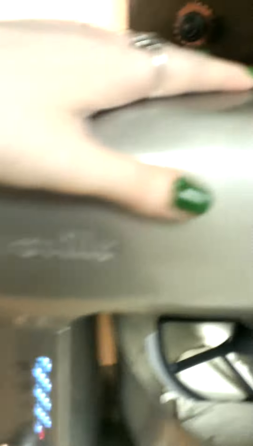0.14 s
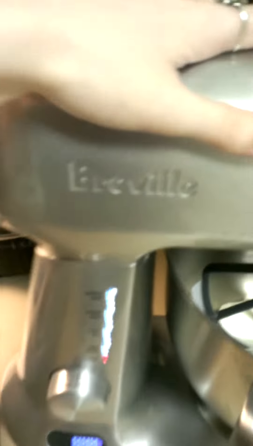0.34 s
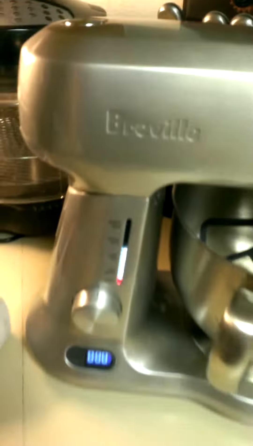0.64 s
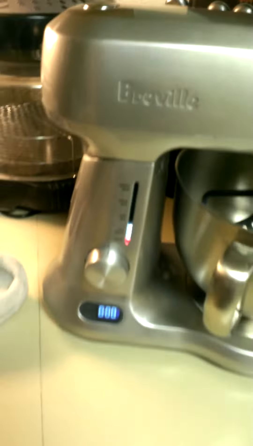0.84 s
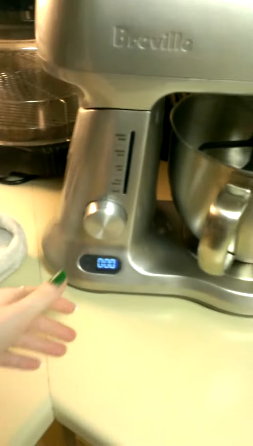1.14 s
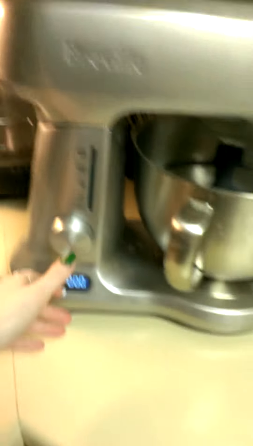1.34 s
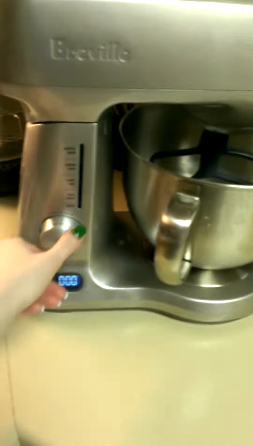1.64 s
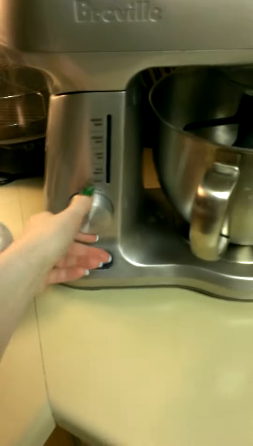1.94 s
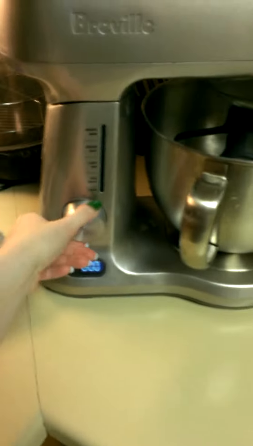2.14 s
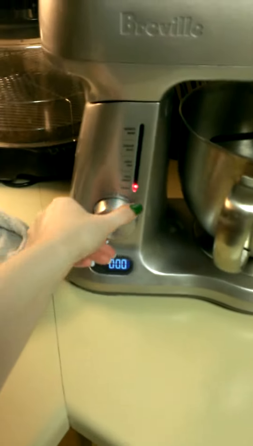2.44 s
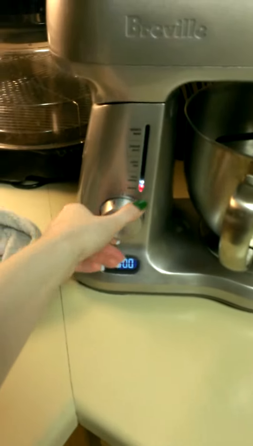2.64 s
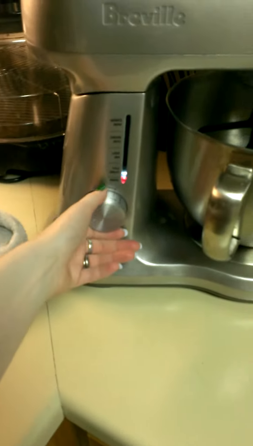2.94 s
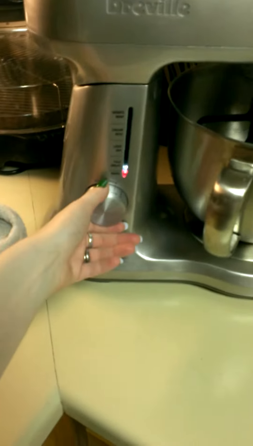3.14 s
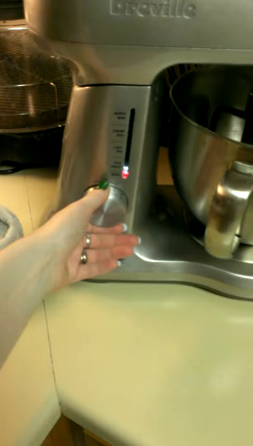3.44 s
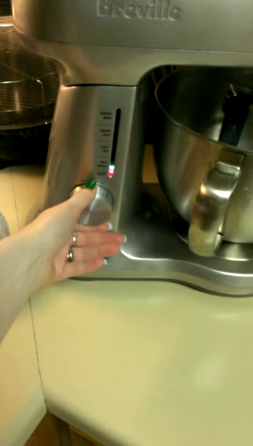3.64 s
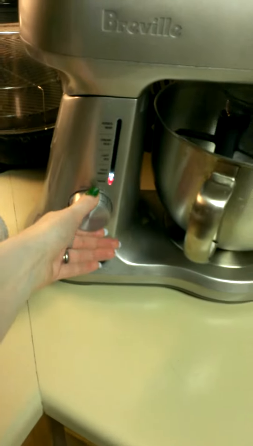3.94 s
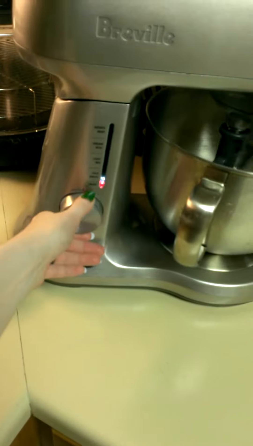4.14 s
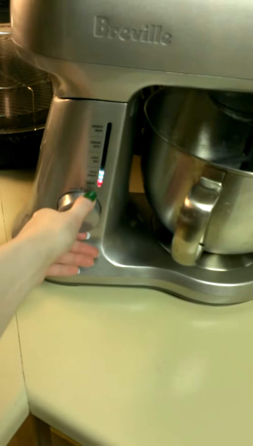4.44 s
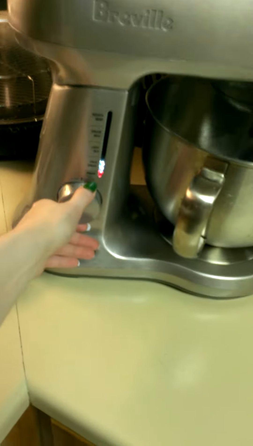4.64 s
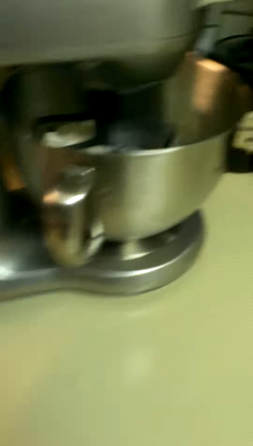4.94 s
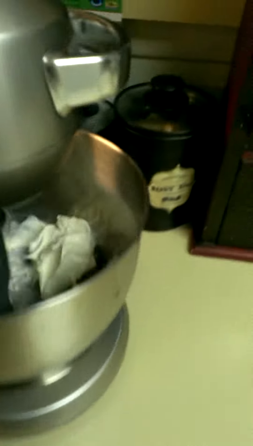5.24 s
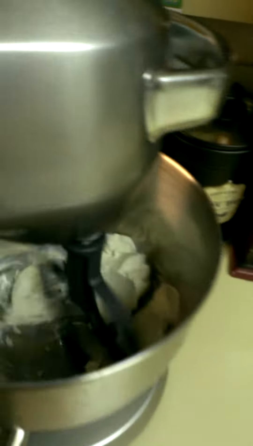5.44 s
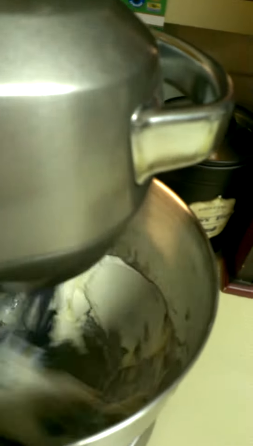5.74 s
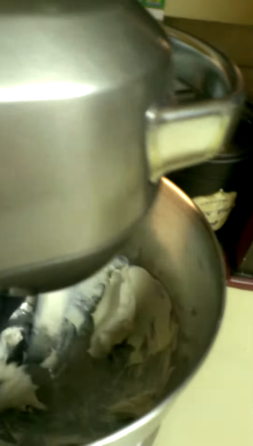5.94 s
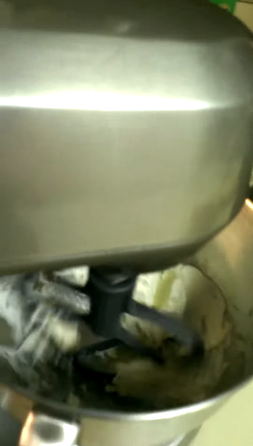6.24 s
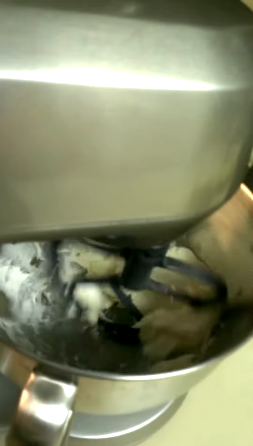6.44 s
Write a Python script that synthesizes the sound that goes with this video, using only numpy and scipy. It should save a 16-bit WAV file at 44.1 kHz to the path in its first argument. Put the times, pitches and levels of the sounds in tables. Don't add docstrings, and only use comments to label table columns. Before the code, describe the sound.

Sharp latch clatter, soft handling and a dial click in a quiet kitchen, then a whining mixer motor with scraping, ticking, knocking beater.

```python
import sys
import numpy as np
from scipy import signal
from scipy.fft import rfft, irfft
from scipy.io import wavfile
from scipy.ndimage import uniform_filter1d

SR = 44100
rng = np.random.default_rng(int(sys.argv[2]) if len(sys.argv) > 2 else 0)


def boost_factor(decibels):
    exponent = np.asarray(decibels, float) / 20
    return 10 ** exponent


def transcribe(signal):
    frames = np.atleast_2d(signal).T
    limited = np.clip(frames, -1, 1)
    pcm = np.round(limited * 32767).astype(np.int16)
    wavfile.write(sys.argv[1], SR, pcm)


N = 290619
TIME = np.arange(N) / SR
LOG_HZ = np.log(np.arange(N // 2 + 1) * SR / N + 1e-3)
HUM_HZ = 120


def level(x, db):
    return x * boost_factor(db) / np.sqrt(np.mean(x ** 2))


def tracks(table):
    times, *columns = np.transpose(table)
    return [np.interp(TIME, times, column, left=-120) for column in columns]


def colour(x, spectrum):
    hz, db = np.transpose(spectrum)
    gain = boost_factor(np.interp(LOG_HZ, np.log(hz), db))
    return level(irfft(rfft(x) * gain, N), 0)


def hiss():
    return rng.standard_normal((2, N))


def ring(x, hz, width):
    return signal.lfilter(*signal.iirpeak(hz, hz / width, fs=SR), x)


def walk(rate):
    hold = int(SR / rate)
    steps = np.repeat(rng.standard_normal(N // hold + 1), hold)
    return 1.76 * uniform_filter1d(steps, hold)[:N]


def grit(rate, spread_db):
    hold = int(SR / rate)
    sizes = boost_factor(spread_db * np.minimum(rng.exponential(size=N // hold + 1), 3))
    return hiss() * uniform_filter1d(np.repeat(sizes, hold), hold)[:N]


def tone(hz, wobble, rate=9):
    path_phase = np.array([[0], [np.pi / 2]])
    return np.sqrt(2) * np.sin(2 * np.pi * hz * TIME + wobble * walk(rate) + path_phase)


# multiple of the hum rate, level/dB re the second line
HUM_HARMONICS = [(3, -15.5), (4, -13.5), (6, -16), (7, -24)]


def motor_hum(hum_db, second_db):
    first = boost_factor(hum_db) * tone(HUM_HZ, 0.34)
    second = boost_factor(second_db) * tone(2 * HUM_HZ, 0.35)
    upper = sum(boost_factor(db + 5.7 * walk(8)) * tone(k * HUM_HZ, 0.78) for k, db in HUM_HARMONICS)
    return first + second + boost_factor(second_db) * upper


# f/Hz, level/dB (per Hz)
WHIRR_SPECTRUM = [(470, -42.5), (800, -5.5), (1020, -10.5), (1830, 1), (1960, 3), (2130, 2), (3540, -6),
                  (4960, -12.5), (7000, -25.5), (9100, -61), (15400, -120)]
# f/Hz, width/Hz, level/dB
HOUSING_MODES = [(723, 39, -2.5), (1617, 19, -4), (2520, 33, -2), (2902, 80, 1), (3170, 34, -6.5),
                 (3570, 92, 0), (2284, 17, -14), (3356, 34, -5)]


def gear_whirr(whirr_db):
    teeth = grit(300, 2.2) * (1 + 0.1 * np.sin(2 * np.pi * HUM_HZ * TIME))
    modes = sum(boost_factor(db + 2.0 * walk(8.1)) * level(ring(teeth, hz, width), 0)
                for hz, width, db in HOUSING_MODES)
    between = boost_factor(-5.5 + 1.3 * walk(25)) * colour(teeth, WHIRR_SPECTRUM)
    return boost_factor(whirr_db - 0.46) * (level(modes, -3.5) + between)


def gear_whine(whine_db, low_whine_db):
    main = tone(1993.0, 2.0, rate=34) + 0.88 * level(ring(hiss(), 1995.0, 80.0), 0)
    low = level(ring(hiss(), 1406.0, 70.0), 0)
    return boost_factor(whine_db - 1.5) * main + boost_factor(low_whine_db + 2.5) * low


# f/Hz, level/dB (per Hz)
RUMBLE_SPECTRUM = [(24, -55), (40, -25), (119, 2.5), (187, -7.5), (236, -6.5), (405, -8), (726, -5.5),
                   (1300, -10), (1690, -38.5), (2860, -120)]


def body_rumble(rumble_db):
    return boost_factor(rumble_db + 1.22 * walk(14)) * colour(hiss(), RUMBLE_SPECTRUM)


# f/Hz, level/dB (per Hz)
SCRAPE_SPECTRUM = [(2650, -27), (4500, -8), (5070, -4.5), (7510, -3), (9200, 4), (9700, -0.5), (10400, -3),
                   (13500, -39.5), (22000, -120)]


def bowl_scrape(scrape_db):
    return boost_factor(scrape_db + 2.8 * walk(32)) * colour(grit(500, 2.44), SCRAPE_SPECTRUM)


# t/s, hum level/dB, second line level/dB, rumble level/dB, whirr level/dB
MOTOR_LEVELS = [(2.7, -77, -75, -68, -79.5), (2.86, -61.5, -56, -60.5, -73), (3.09, -54, -51.5, -56.5, -61),
                (3.32, -49, -47, -60.5, -58.5), (3.44, -54, -50, -55, -48.5), (3.64, -48, -42, -48.5, -56),
                (3.69, -46, -46, -49.5, -51.5), (3.79, -54, -52, -54.5, -54.5),
                (3.86, -46, -44.5, -51.5, -43.5), (4.09, -49, -48, -47.5, -55),
                (4.14, -55, -55.5, -55.5, -49), (4.31, -47, -38, -42.5, -43.5),
                (4.38, -51, -67, -52, -45.5), (4.45, -62, -49, -52, -42.5),
                (4.53, -49.5, -44.5, -46, -41.5), (4.75, -47.5, -47.5, -49, -47.5),
                (4.79, -54, -71, -45.5, -42.5), (4.83, -43, -45, -57.5, -43.5),
                (4.88, -52, -48, -45, -47.5), (4.92, -44, -45.5, -50, -40.5),
                (4.99, -50, -50, -46.5, -46.5), (5.06, -55, -43, -49, -35), (5.12, -42, -47, -50, -41.5),
                (5.15, -52, -50, -51.5, -39.5), (5.27, -45, -46, -40.5, -38), (5.31, -53, -66, -46, -48.5),
                (5.34, -70, -60.5, -46.5, -39), (5.4, -43, -70, -41.5, -47.5), (5.44, -57, -60, -47.5, -44),
                (5.48, -44, -54, -51, -41), (5.54, -46, -40.5, -42, -37.5), (5.6, -43, -55, -43, -37.5),
                (5.71, -47.5, -45.5, -46, -32), (5.97, -42.5, -49.5, -43, -37),
                (6.11, -51, -48, -44.5, -39), (6.31, -44.5, -46.5, -44.5, -38.5),
                (6.45, -60, -62.5, -45.5, -38), (6.52, -43, -38.5, -48, -34.5),
                (6.59, -59, -47, -38, -41.5)]
# t/s, main whine level/dB, low whine level/dB, scrape level/dB
GEAR_LEVELS = [(2.75, -72, -75, -98), (3.01, -62, -74, -79), (3.14, -53, -60, -62), (3.39, -53.5, -64, -81),
               (3.55, -53, -58, -63), (4.08, -50, -51.5, -55), (4.15, -61, -61.5, -60),
               (4.24, -45, -53, -57), (4.43, -68, -54, -58.5), (4.54, -57, -50, -55), (4.7, -56, -65, -57),
               (4.77, -51, -57, -55.5), (4.82, -55, -53, -53.5), (5.08, -53, -58, -54),
               (5.16, -46, -59, -53.5), (5.31, -48, -50, -53.5), (5.53, -43, -54, -59.5),
               (5.65, -46, -51, -54.5), (5.75, -40.5, -57, -47), (6.09, -50, -52, -56.5),
               (6.32, -48, -56, -57.5), (6.4, -56, -61, -60.5), (6.59, -43, -56, -57)]


def motor():
    hum_db, second_db, rumble_db, whirr_db = tracks(MOTOR_LEVELS)
    whine_db, low_whine_db, scrape_db = tracks(GEAR_LEVELS)
    gears = gear_whirr(whirr_db) + gear_whine(whine_db, low_whine_db)
    return motor_hum(hum_db, second_db) + gears + body_rumble(rumble_db) + bowl_scrape(scrape_db)


# f/Hz, level/dB (per Hz)
THUD_SPECTRUM = [(120, -27.5), (250, -7), (900, -8), (1500, -31.5), (3000, -56.5)]
BODY_SPECTRUM = [(600, -24.5), (1200, 0), (2400, 4.5), (4300, 1.5), (6500, -18), (9000, -36.5)]


def knocks(table, ring_db, width, tail_db, tail_t60, rise_s):
    thud = colour(hiss(), THUD_SPECTRUM)
    body = colour(hiss(), BODY_SPECTRUM)
    fizz = colour(hiss(), SCRAPE_SPECTRUM)
    out, t, push = np.zeros((2, N)), TIME[:SR // 2], hiss()
    for s, db, hz, thud_db, fizz_db, t60 in table:
        start = int(s * SR)
        part = slice(start, min(start + len(t), N))
        direct = boost_factor(-60 * t / np.clip(t60, 0.01, 1))
        room = boost_factor(tail_db - 60 * t / tail_t60)
        shape = ((1 - np.exp(-t / rise_s)) * (direct + room))[:part.stop - start]
        burst = level(ring(push[:, part], hz, width), ring_db) + body[:, part]
        burst = burst + boost_factor(thud_db) * thud[:, part] + boost_factor(fizz_db) * fizz[:, part]
        out[:, part] += boost_factor(db - 10) * shape * burst
    return out


# t/s, peak level/dB, ring f/Hz, thud level/dB, fizz level/dB, t60/s
BOWL_KNOCKS = [
    (4.1494, -40.5, 3380, -12, -25, 0.14),
    (4.2694, -32, 1606, -9, -9, 0.12),
    (4.5194, -31.5, 1620, -11, -31, 0.12),
    (4.605, -25.5, 1623, -16, -21, 0.087),
    (4.7679, -23.5, 1645, -16.5, -29, 0.096),
    (5.391, -20.5, 2520, -22, -36, 0.077),
    (5.479, -29.5, 1990, -17.5, -31, 0.085),
    (5.5483, -21, 1643, -19, -18, 0.085),
    (5.8444, -24, 1616, -16.5, -26, 0.093),
    (6.4502, -25.5, 3570, -18.5, -13, 0.1),
]


def bowl_knocks():
    return knocks(BOWL_KNOCKS, ring_db=5, width=47.0, tail_db=-15.5, tail_t60=0.39, rise_s=0.0017)


# t/s, peak level/dB, ring f/Hz, thud level/dB, fizz level/dB, t60/s
TICK_CONTACTS = [(2.166, -37, 3570, -17, -5, 0.044), (2.2494, -51, 3920, -13, 5, 0.045),
                 (2.3052, -47, 2720, -13, 5.5, 0.062), (2.405, -47.5, 3450, -14, -4, 0.042),
                 (2.69, -40.5, 4000, -16, 3.5, 0.052), (3.6427, -25.5, 2600, -21, -10, 0.055),
                 (4.06, -34.5, 2920, -10, -7, 0.04), (4.1294, -43.5, 3360, -12, -21, 0.05),
                 (4.2937, -22.5, 4450, -20, -17, 0.053), (4.9711, -23, 3680, -24.5, -8, 0.065),
                 (5.1682, -31.5, 3000, -18, -19, 0.044), (5.2602, -19.5, 2920, -11, -32, 0.044),
                 (5.4544, -31.5, 3200, -18.5, -6, 0.055), (5.6138, -23, 3100, -16.5, -33, 0.052),
                 (5.713, -25, 3670, -25.5, -25, 0.038), (5.8064, -23.5, 3680, -19, -7, 0.05),
                 (5.891, -25.5, 3170, -22.5, -4.5, 0.046), (5.908, -24, 3500, -22, -34, 0.034),
                 (6.14, -23.5, 2900, -11.5, -20, 0.05), (6.2244, -28, 3460, -18, 1.5, 0.044),
                 (6.25, -27.5, 3520, -8.5, -3, 0.05), (6.287, -25.5, 3650, -9, -19, 0.056),
                 (6.5494, -26.5, 3540, -11.5, -14, 0.05), (6.571, -26.5, 3570, -16, -12.5, 0.05)]


def ticks():
    return knocks(TICK_CONTACTS, ring_db=-2.5, width=420.0, tail_db=-12, tail_t60=0.35, rise_s=0.0006)


# t/s, level/dB
LATCH_CONTACTS = [
    (.1285, -46),
    (0.1349, -13),
    (.137, 1),
    (.1385, -6.5),
    (.140, -0.5),
    (0.1421, -2),
    (0.145, -7.5),
    (.149, -5),
]
# f/Hz, level/dB, t60/s
LATCH_MODES = [(246, -20.5, 0.17), (490, -21, 0.14), (926, -20, 0.077), (1360, -9.5, .05),
               (1900, -1.5, 0.057), (2400, -0.5, 0.026), (3060, -6, 0.033), (3870, -8, 0.044),
               (6300, -13, .02), (8810, -6.5, 0.034)]
# f/Hz, level/dB (per Hz)
LATCH_TAIL_SPECTRUM = [(88, -35.5), (150, -6.5), (405, -14.5), (484, -3), (1090, -13), (1890, -2),
                       (2340, -13), (4140, -12), (7420, -26.5), (8870, -16), (10400, -34.5), (13500, -64),
                       (22000, -120)]


def latch():
    t, out = TIME[:SR // 2], np.zeros((2, N))
    for s, db in LATCH_CONTACTS:
        start = int(s * SR)
        for hz, mode_db, t60 in LATCH_MODES:
            level_luck, pitch_luck = rng.standard_normal((2, 2, 1))
            fade = boost_factor(db + mode_db - 19.5 + 3 * level_luck - 60 * t / t60)
            out[:, start:start + len(t)] += fade * np.sin(2 * np.pi * hz * (1 + 0.046 * pitch_luck) * t)
    after = np.clip(TIME - 0.137, 0, None)
    fade = boost_factor(-36.5 - 60 * after / 0.041) + boost_factor(-27 - 60 * after / 0.25)
    tail = fade * (1 - np.exp(-after / 0.0014))
    out = out + tail * colour(hiss(), LATCH_TAIL_SPECTRUM)
    return signal.sosfilt(signal.butter(2, 170, "high", fs=SR, output="sos"), out)


# f/Hz, width/Hz, level/dB
SNAP_MODES = [(4400, 500, -12), (6400, 200, -15), (6940, 170, -13), (9300, 300, -10), (9800, 280, 0)]


def dial_snap():
    after = np.clip(TIME - 1.772, 0, None)
    fade = boost_factor(-2.5 - 60 * after / 0.028) + boost_factor(-1.0 - 60 * after / 0.32)
    shape = fade * (1 - np.exp(-after / 0.00054))
    parts = sum(boost_factor(db) * level(ring(hiss(), hz, width), 0) for hz, width, db in SNAP_MODES)
    return boost_factor(-40) * shape * parts


# t/s, peak level/dB, ring f/Hz, thud level/dB, fizz level/dB, t60/s
CLINK_CONTACTS = [
    (0.0064, -34.5, 2380, -21, -2, 0.1),
    (0.0154, -36, 1630, -27, -13.5, 0.22),
    (0.1064, -51, 1810, 10.5, 11.5, 0.32),
    (0.543, -42, 2410, -6.5, -20, 0.43),
    (0.7178, -37, 2330, -22, -12, 0.46),
    (1.9939, -39, 2400, -24, -2.5, 0.37),
    (2.0485, -47.5, 2530, -14, -16, 0.25),
    (2.4548, -39.5, 2250, -15, -15, 0.35),
]


def clinks():
    return knocks(CLINK_CONTACTS, ring_db=-2.5, width=77.0, tail_db=-17, tail_t60=0.64, rise_s=0.0017)


# t/s, peak level/dB, ring f/Hz, thud level/dB, fizz level/dB, t60/s
RUSTLE_CONTACTS = [(0.2194, -41.5, 3370, -12, -9, 0.3), (0.373, -46.5, 1270, -14, -9, 0.31),
                   (0.5094, -51, 1900, 1, -4, 0.35), (0.6794, -46.5, 1380, -13, -7, 0.42),
                   (1.0494, -50, 2800, -18, -21, 0.3), (1.1994, -51.5, 1650, -15, -8, 0.3),
                   (1.316, -45, 2680, -24, -1, 0.28), (1.3794, -47.5, 1980, -10, -10, 0.43),
                   (1.428, -41.5, 2230, -4, -7, 0.2), (2.124, -41.5, 3640, -12, 1.5, 0.35),
                   (2.199, -48, 2320, -4, -11, 0.34), (2.5994, -48, 1910, -11, 3, 0.3),
                   (2.6294, -52, 3330, -15, -11, 0.25), (2.8794, -49, 1160, -5, -11, 0.32),
                   (3.125, -36.5, 2310, -7, -24, 0.39), (3.4113, -32, 2300, -18, -6, 0.32),
                   (3.6894, -39.5, 1410, -6, -14, 0.37), (3.8437, -33, 2080, -10.5, -28, 0.33),
                   (3.898, -35.5, 2290, -19, -32, 0.36), (4.2294, -36, 2010, -8, -23, 0.27),
                   (4.9366, -30.5, 1640, -18, -11, 0.3), (4.999, -28.5, 3680, -10, -11, 0.37),
                   (5.079, -30.5, 2300, -10, -19, 0.35), (5.7696, -23, 2030, -17, -7.5, 0.21),
                   (5.9988, -28, 2830, -10.5, -14, 0.3), (6.116, -21, 2660, -12.5, -9.5, 0.28)]


def rustles():
    return knocks(RUSTLE_CONTACTS, ring_db=-11.5, width=200.0, tail_db=-15.5, tail_t60=0.42, rise_s=0.0065)


# f/Hz, level/dB (per Hz)
KITCHEN_SPECTRUM = [(12, -22), (20, 0), (65, -13), (112, -2), (167, -12.5), (395, -8.5), (513, -14),
                    (1350, -14.5), (1460, -13), (3850, -19), (7600, -30.5), (9370, -30.5), (10400, -35),
                    (13500, -68), (22000, -120)]


def kitchen():
    air = boost_factor(-57 - 1.5 + 1.37 * walk(4.94)) * colour(hiss(), KITCHEN_SPECTRUM)
    fridge = boost_factor(-65 + 2.2 * walk(4)) * tone(HUM_HZ, 0.7)
    return air + fridge


def scene():
    mixer = motor() + bowl_knocks() + ticks()
    handling = latch() + dial_snap() + clinks() + rustles()
    return mixer + handling + kitchen()


# f/Hz, likeness (0-1), left phase lead/rad, left minus right level/dB
PORTS = [(25, 0.5, 2, -3), (70, 0.93, 1.82, -3), (136, 0.98, 2.12, 0), (267, 0.82, 2.74, 1.5),
         (593, 0.79, 2.36, -7.5), (1100, 0.58, 2.25, -1), (1900, 0.67, 1.2, 2.5), (3600, 0.2, 1.5, 9),
         (6000, 0.3, 1.6, -4.5), (8760, 0.35, 1.3, -23.5), (11100, 0.23, 1.5, -7.5)]
# f/Hz, level/dB
TREBLE_LIMIT = [(10350, 0.5), (10650, -16.5), (11200, -45.5), (11600, -87)]


def microphones(dry):
    hz, *columns = np.transpose(PORTS)
    like, lead, balance_db = (np.interp(LOG_HZ, np.log(hz), column) for column in columns)
    like = np.clip(like, 0, 1)
    limit_hz, limit_db = np.transpose(TREBLE_LIMIT)
    straight, scattered = rfft(dry) * boost_factor(np.interp(LOG_HZ, np.log(limit_hz), limit_db))
    left, right = boost_factor(balance_db / 2), boost_factor(-balance_db / 2)
    centre = np.sqrt(left ** 2 + right ** 2 + 2 * left * right * like * np.cos(lead)) / 2
    lagged = like * np.exp(-1j * lead) * straight
    pair = [left * straight, right * (lagged + np.sqrt(1 - like ** 2) * scattered)]
    return irfft(pair / centre, N)


def roll_off(x):
    return signal.sosfilt(signal.butter(12, 11490, fs=SR, output="sos"), x)


def record(dry):
    mix = microphones(dry)
    return roll_off(mix)


dry = scene()
out = record(dry)
transcribe(out)
```